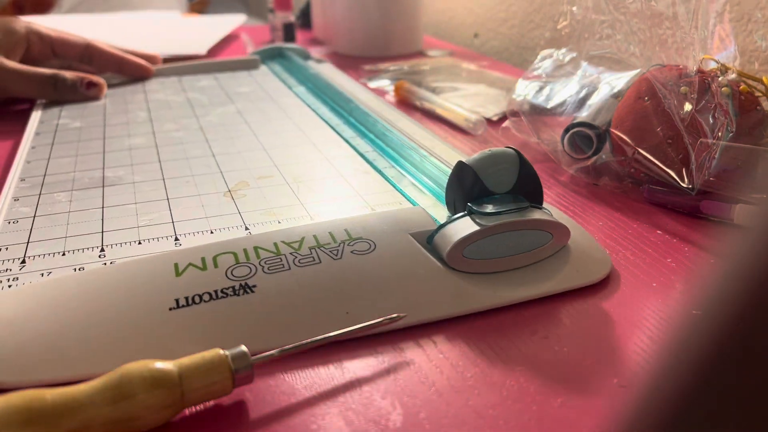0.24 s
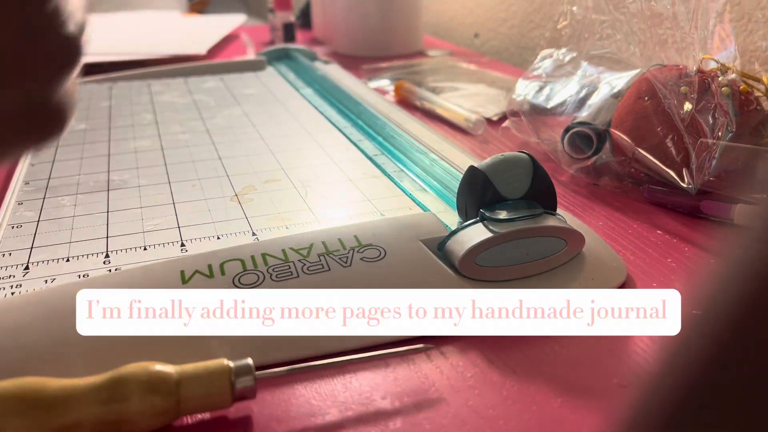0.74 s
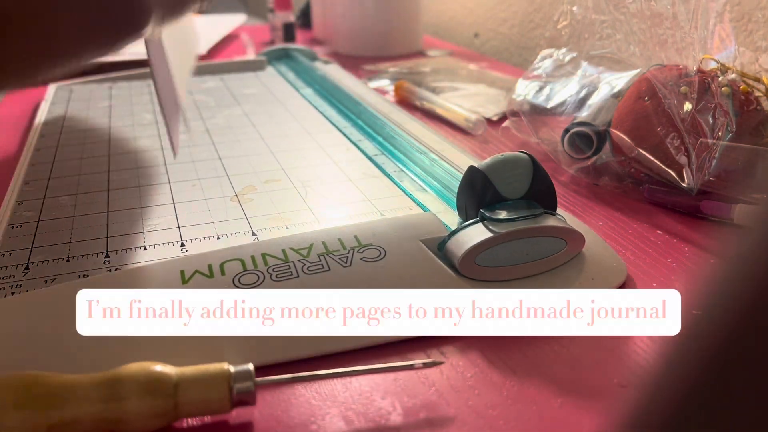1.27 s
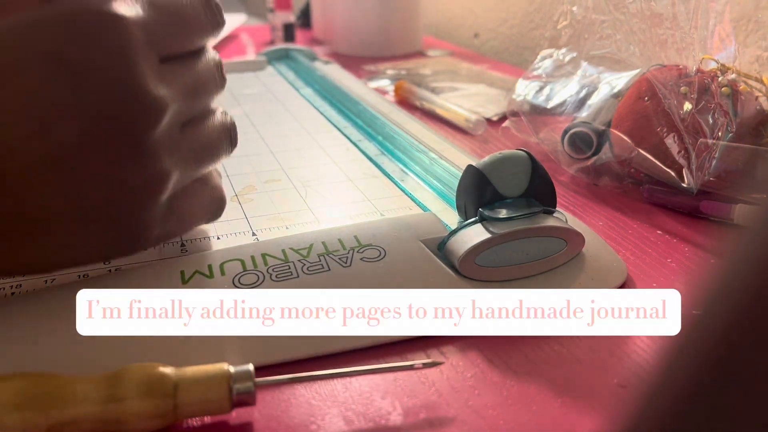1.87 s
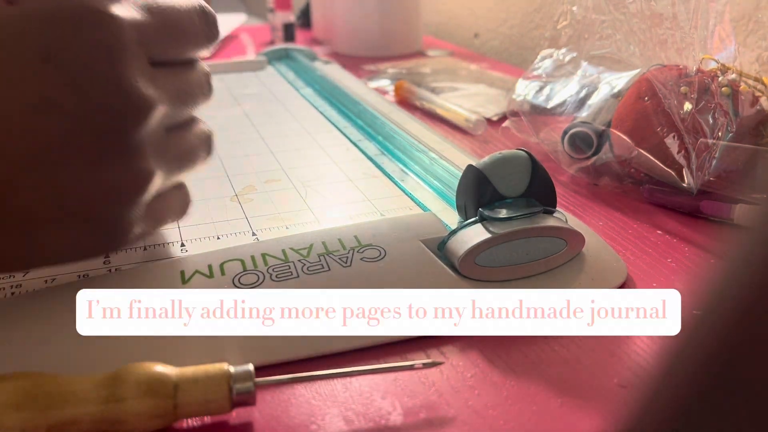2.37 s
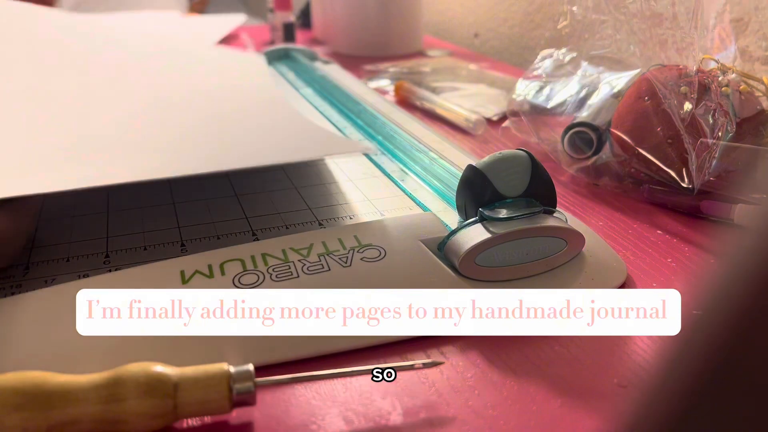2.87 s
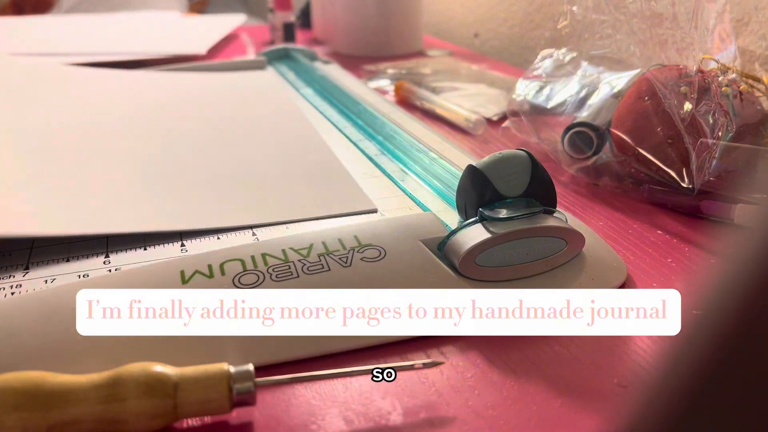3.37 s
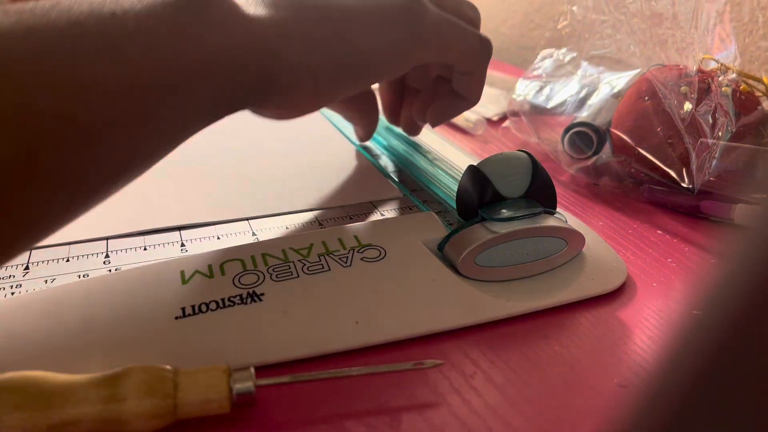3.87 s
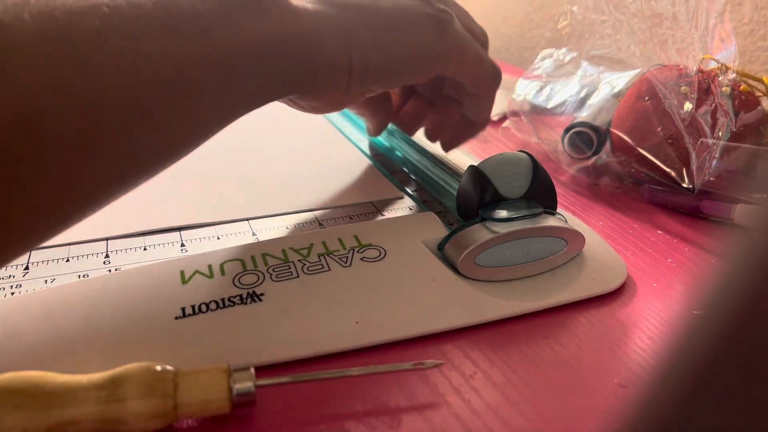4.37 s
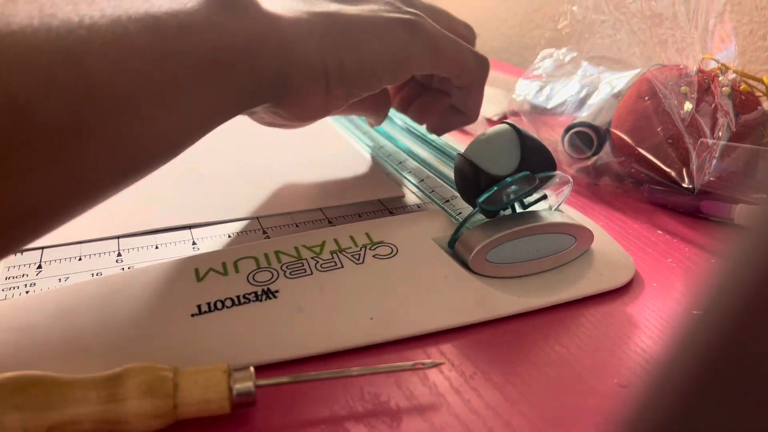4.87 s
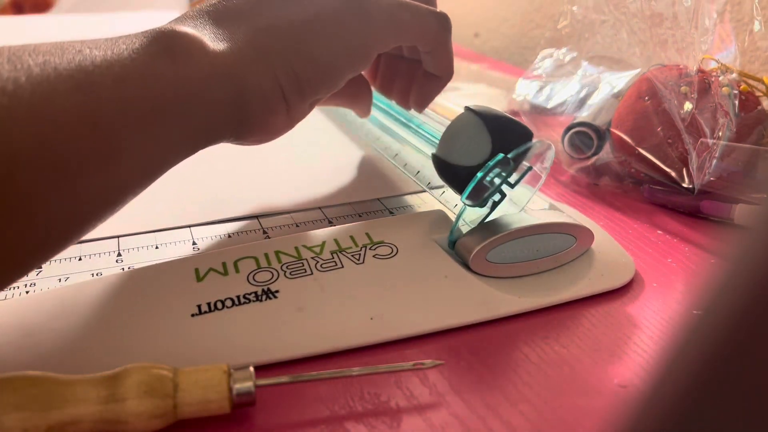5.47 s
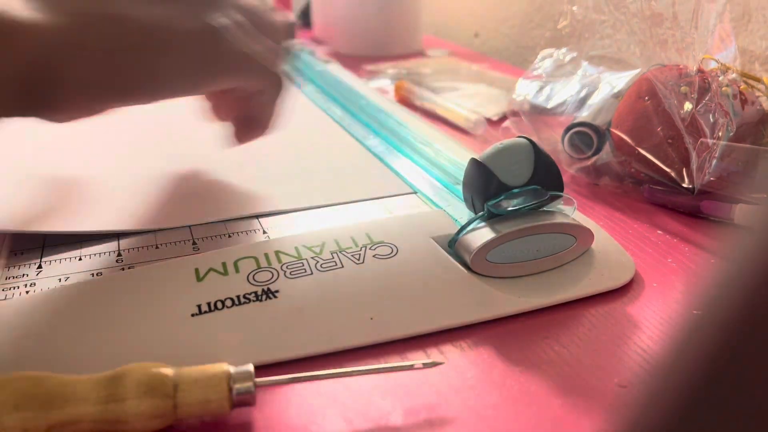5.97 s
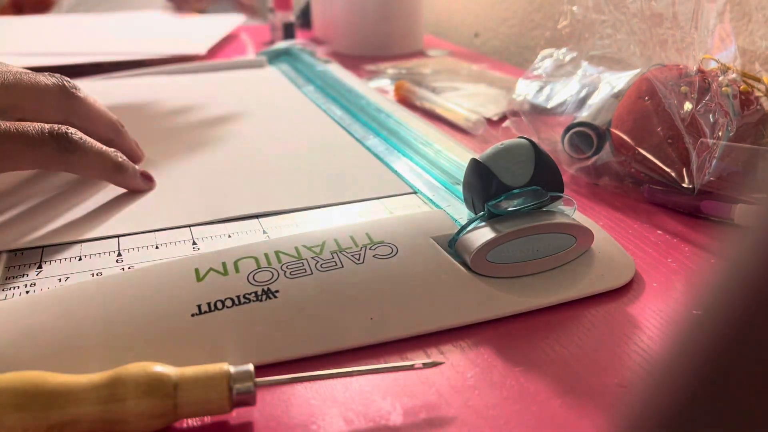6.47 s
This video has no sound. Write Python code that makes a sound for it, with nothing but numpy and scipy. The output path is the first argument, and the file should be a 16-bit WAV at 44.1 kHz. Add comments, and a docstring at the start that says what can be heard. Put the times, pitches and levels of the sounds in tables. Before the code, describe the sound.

Close on a desk in a small room with a faint, wavering low hum. Paper rubs and flaps sharply as it is picked up, then a stack is tapped three times on its edge with solid knocks. It slides onto a plastic trimmer bed. Plastic clicks, the hinged rail swings up with a hard clack, a sheet glides under, and the rail drops back with quick rebounds and a last click.

```python
"""A paper trimmer on a desk in a small room, close to the microphone, over a low hum that wavers.
First, paper flaps and rubs as it is picked up; then the stack is tapped three times on its edge and slid
onto the plastic bed. Next, parts click, the hinged rail swings up, a sheet glides under it, and the rail
drops back with rebounds, followed by a few last touches and glides. Knocks are decaying tones plus
shaped noise; paper is shaped noise that swells and fades, with some ringing of the sheet."""
import sys
import numpy as np
from scipy import signal
from scipy.fft import rfft, irfft, next_fast_len
from scipy.io import wavfile
from scipy.ndimage import map_coordinates

SR = 44100
rng = np.random.default_rng(int(sys.argv[2]) if len(sys.argv) > 2 else 0)


def wav_out(sig):
    """Save sig, one row per channel (or a flat mono array), as 16-bit PCM at SR to the path in sys.argv[1]."""
    wavfile.write(sys.argv[1], SR, np.round(np.clip(np.atleast_2d(sig).T, -1, 1) * 32767).astype(np.int16))


N = 296352  # length of the scene in samples
T = np.arange(16384) / SR  # the clock of one short sound, in seconds

# Soft rumble of the room. Each row: frequency in Hz, relative level in dB per Hz.
ROOM_RUMBLE = [(28, -26), (42, -9), (75, -8), (135, -8), (175, -17), (240, -16), (330, -24), (650, -27),
               (950, -39), (3000, -51), (9000, -58), (16000, -74)]
RUMBLE_DB = -39
# How alike the rumble is on left and right. Each row: frequency in Hz, likeness (1 = the same).
LEFT_RIGHT_LIKENESS = [(60, .97), (250, .85), (1000, .5), (4000, .3)]
# The low hum. Each row: frequency in Hz, level in dB, most it wavers in dB.
HUM = [(56.017, -38.5, 7)]

# Tones at which things ring when struck. Each row: frequency in Hz, relative level in dB,
# seconds to fade by 60 dB. In order: desk, plastic bed, rail and carriage, stiff sheet of paper,
# thin steel, and the bed as it rings on under the tapped stack.
DESK_MODES = [(60.87, -15, 0.3984), (89.21, -2, 0.12), (125.87, 7.5, 0.11108), (179.04, 5, 0.0301)]
BED_MODES = [(253, 10, .14), (325, 0, .07), (443, -1, .12), (541, 0, .16), (612, -3, .15), (676, 0, .17),
             (785, -4, .09), (835, -3, .09), (1050, -2, .07)]
RAIL_MODES = [(1720, 5, .1), (2255, 1, .2), (2850, -3, .11), (3700, -1, .1), (4330, -2, .11),
              (6850, 1, .06), (8180, -4, .05)]
SHEET_MODES = [(780, -1, .04), (965, 0, .04), (1130, -1, .04), (1668, -4, .08), (1990, -3, .03),
               (2250, -4, .07), (2460, -2, .04), (2870, -1, .06)]
STEEL_MODES = [(4230, -5, .12), (4480, 3, .03), (8457, -7, .06)]
BED_UNDER_STACK_MODES = [(522, -2, .34), (565, -1, .42), (620, -2, .38), (711, -1, .32), (845, -5, .25),
                         (1114, -8, .3), (1200, -8, .3), (1766, -12, .32), (1900, -13, .28)]

# Tone colours of noise. Each row: frequency in Hz, relative level in dB per Hz.
# In order: hard clack, bright tick, dull rub, bright hiss, small creases giving way, fine even glide.
CLACK_COLOUR = [(500, -10), (1000, 2), (1400, 0), (1850, -4), (2400, -11), (5000, -22), (9000, -32),
                (11000, -39)]
TICK_COLOUR = [(1500, -22), (2300, -5), (3200, -2), (5200, 0), (5900, -4), (7000, 2), (9000, -2),
               (10500, -18), (16000, -30)]
RUB_COLOUR = [(150, -22.5), (450, -2.5), (900, 0), (1600, -7.5), (3000, -15), (5000, -15), (10000, -38.5)]
HISS_COLOUR = [(1500, -10.5), (3500, 1.5), (6000, -3), (8800, 10.5), (10500, -10.5), (16000, -7)]
CREASE_COLOUR = [(300, -16.5), (900, 1.5), (1600, 5), (2700, -2), (4500, 1.5), (9000, -20.5), (15000, -34)]
GLIDE_COLOUR = [(1200, -4.5), (2400, -15), (4150, 0), (5800, -13.5), (8800, -10.5), (10200, -27.5),
                (15500, -19.5)]
# Tone colours that move with the pitch or centre of the sound.
# Each row: multiple of that pitch or centre, relative level in dB per Hz.
KNOCK_COLOUR = [(.15, -20), (.45, -5), (1, 0), (1.7, -4), (2.7, -16), (6, -42), (16, -72)]
FLAP_COLOUR = [(.1, -22), (.4, -10), (.8, -1), (1.3, 0), (2.1, -7), (3.5, -22), (8, -41), (16, -60)]
SWISH_COLOUR = [(.15, -8.5), (.5, -4.5), (1, 1.5), (1.45, -7.5), (2.1, -18.5), (4, -29), (12, -50.5)]

# Light touches of fingers and paper on the trimmer.
# Each row: start in seconds, knock level in dB, pitch in Hz, tick level in dB.
TOUCHES = [(0.349, -31.5, 445.7, -44), (0.507, -33.5, 307.6, -46), (1.416, -20.5, 148.7, -48.5),
           (1.449, -20, 328.7, -35.5), (2.238, -33.5, 416.9, -60), (3.06, -33, 485.9, -65),
           (3.316, -26, 318.8, -39), (3.838, -37, 380, -62), (3.969, -27, 392.9, -42),
           (4.034, -29, 605.5, -43), (4.343, -28.5, 645.2, -70.5), (4.579, -24, 320.8, -46.5),
           (4.945, -33.5, 744.1, -57.5), (5.157, -25.5, 571.4, -68), (5.307, -35, 620, -75),
           (5.435, -37, 726.9, -66), (5.895, -29.5, 568.4, -64), (5.639, -36.5, 911.2, -43.5),
           (6.0755, -36.5, 1457, -46.5), (6.64, -31, 520, -50)]
PING_S, PING_DB = .349, -35  # start in seconds and level of the small steel ping

# A waved sheet swishes softly through the air.
# Each row: peak in seconds, level in dB, centre in Hz, rise in seconds.
SWISHES = [(.3, -38, 897.3, 0.0754), (2.836, -30.5, 869.6, 0.028), (3.164, -37, 623.7, .012)]
# A flat sheet is eased over the smooth bed. Each row: start in seconds, end in seconds, level in dB.
GLIDES = [(4.97, 5.488, -55), (5.783, 5.948, -53.5), (6.38, 6.671, -63.5)]
# Pushes of paper across the bed. Each row: time of full speed in seconds, hold in seconds,
# seconds to rise by 60 dB, dull rub level in dB, bright hiss level in dB.
PUSHES = [(0.0, 0.3655, .1, -47, -65), (0.283, 0.0648, 0.6891, -41, -52.5),
          (0.751, 0.0809, 0.0429, -43, -42.5), (0.899, 0.07143, 0.8152, -34.5, -62.5),
          (1.019, 0.19866, 2.7933, -49, -59), (1.417, .035, .018, -38, -34),
          (2.337, 0.1118, 0.8754, -48.5, -51), (2.489, 0.2391, 0.0008, -44.5, -53),
          (2.739, 0.04771, 0.0394, -51, -39.5), (3.071, 0.08863, .5, -57.5, -41.5),
          (3.339, 0.21921, 1.5281, -50, -54), (3.822, .015, .03, -60, -54),
          (6.088, 0.13845, 0.6691, -50, -57.5)]
PUSH_T60_S = 0.24966  # seconds for a push to run out by 60 dB
# Sheets flap and buckle. Each row: peak in seconds, level in dB, centre in Hz, rise in seconds.
FLAPS = [(0.757, -36, 1050, .006), (0.836, -25, 1150, .006), (0.86, -16, 1200, .0045),
         (0.877, -12.5, 1350, .0045), (0.904, -28, 1450, .004), (0.987, -28.5, 1650, .006),
         (1.421, -29, 750, .005), (2.415, -41, 2200, .016), (2.525, -40, 2100, .018),
         (2.616, -31, 2800, .003), (2.641, -20, 2400, .007), (2.642, -31, 800, .007),
         (3.059, -25, 1900, .0022), (3.39, -40, 1100, .012), (3.503, -37, 790, .009),
         (5.61, -42, 900, .018), (6.215, -46, 2000, .007)]
FLAP_T60_S, FLAP_T60_PER_RISE = 0.028395, 5.335  # a slow flap also dies slowly
FLAP_HOLD = 0.677  # full strength for this share of the rise time, either side of the peak

# Plastic catches and lets go, then the bed takes the load. Each row: start in seconds, tick level in dB,
# lag of the load in seconds, its knock level in dB, its pitch in Hz, its thump level in dB.
CLICKS = [(0.8246, -27.5, 0.006955, -53.5, 298.3, -23), (3.477, -34.5, .012, -24, 277.9, -37.5),
          (4.47, -33.5, 0.011, -17, 371.2, -52), (4.5315, -21.5, 0.004, -14, 333.4, -22),
          (4.8262, -17, 0.00093, -20, 247, -47.5), (6.058, -34.5, .017, -24.5, 281.7, -21.5)]
# The stack is tapped on its edge. Each row: start in seconds, knock level in dB, desk thump level in dB,
# clack level in dB, lead of the first corner in seconds, corner knock level in dB, corner pitch in Hz,
# corner tick level in dB, corner squash in seconds, shiver of the sheets in dB, ring of the bed in dB.
STACK_TAPS = [(1.47, -8.5, -17, -29, .022, -17, 1000, -28, .006, -44, -33),
              (1.8059, -7.5, -22, -15, .011, -22, 930, -61, .07, -30, -23.5),
              (2.1205, -9, -27, -28, .0065, -10.5, 1050, -35, .002, -33, -28.5)]
# The knock deepens as more of the stack touches: the whole edge, then its full weight.
EDGE_HZ, WEIGHT_HZ = 570, 235
WEIGHT_LAG_S, WEIGHT_DB = 0.0105, -17
# The rail meets its stop and rebounds, going up and coming down. Each row: start in seconds,
# knock level in dB, pitch in Hz, desk thump level in dB, clack level in dB, tick level in dB.
RAIL_STOPS = [(4.799, -7.5, 610, -26, -18, -52), (4.8105, -12, 135, -20, -28, -43),
              (5.667, -14, 800, -38, -15, -38), (5.6945, -14.5, 410, -23, -24, -55),
              (5.724, -26, 140, -20, -52, -70)]

# How fast the room's tail fades. Each row: frequency in Hz, seconds to fade by 60 dB.
ROOM_T60 = [(100, 0.3555), (600, 0.28383), (2000, 0.3311), (6000, 0.2995), (14000, 0.11)]
DIRECT_DB = -1.2759  # the straight path to the microphone
# Level difference between the two microphone ports. Each row: frequency in Hz, left minus right in dB.
PORT_BALANCE = [(60, -.7), (200, -2.5), (400, -2.5), (700, -1), (1290, 2), (2380, 6), (4400, 5), (8100, 1),
                (15000, 0)]
# How far the left port leads, for paper and for the trimmer.
# Each row: frequency in Hz, lead in radians (before the low notes are brought together).
PAPER_LEAD = [(550, -0.1379), (900, -1.4293), (1400, -2.5), (2500, 0.944), (4400, 1.2622), (8100, 1.0293)]
TRIMMER_LEAD = [(300, -0.06), (700, 0.298), (1400, 1), (2800, 0.63), (4400, -0.19), (8100, 1)]
BOTTOM_HZ, TOP_HZ = 39.38, 16400  # the band the microphone passes


def amp(db):
    """Turn decibels into a gain."""
    return 10 ** (np.asarray(db) / 20)


def unit(x, seconds=None):
    """Scale to an rms of 1, over the whole sound or over its first seconds."""
    head = x if seconds is None else x[:int(seconds * SR)]
    return x / np.sqrt(np.mean(head ** 2) + 1e-20)


def along(points, hz):
    """Read a curve of (frequency, value) points on a log frequency axis."""
    point_hz, values = np.transpose(points)
    return np.interp(np.log(hz + 1e-6), np.log(point_hz), values)


def wobble(rate, size=N):
    """Make a smooth random curve through rate random points a second."""
    points = rng.standard_normal(int(size * rate / SR) + 4)
    return map_coordinates(points, [np.arange(size) * rate / SR])


def filtered(x, response):
    """Change the level, and the phase if wanted, of each frequency in a long sound."""
    size = next_fast_len(N + 8192)
    gains = response(np.fft.rfftfreq(size, 1 / SR))
    return irfft(rfft(x, size) * gains, size)[..., :N]


def coloured(x, colour, scale_hz=1):
    """Give a short sound a tone colour with a filter that never acts ahead of the sound."""
    n = len(x)
    hz = np.fft.rfftfreq(n, 1 / SR)
    # folding the cepstrum gives the filter minimum phase
    cepstrum = irfft(np.log(amp(along(colour, hz / scale_hz))))
    cepstrum[1:n // 2] *= 2
    cepstrum[n // 2 + 1:] = 0
    return irfft(rfft(x) * np.exp(rfft(cepstrum)))


def noise_of_colour(x, colour):
    """Give a long noise a tone colour and an rms of 1."""
    return unit(filtered(x, lambda hz: amp(along(colour, hz))))


def fade(t60):
    """Fade exponentially, by 60 dB in t60 seconds."""
    return np.exp(-np.log(1000) * T / t60)


def ring(modes, gains, stretch=1):
    """Add fading sine tones, all struck together; stretch shifts their pitch."""
    return sum(gain * amp(db) * fade(t60) * np.sin(2 * np.pi * hz * stretch * T)
               for (hz, db, t60), gain in zip(modes, gains))


def burst(t60, rattle_db, rattle_t60, onset_t60):
    """A short crack of noise followed by the dense, weaker ringing of plastic."""
    level = fade(t60) + amp(rattle_db) * fade(rattle_t60)
    return rng.standard_normal(len(T)) * level * (1 - fade(onset_t60))


def fibres(size, rate, share):
    """Friction noise: a smooth rush plus single fibres catching, about rate a second."""
    catches = (rng.random(size) < rate / SR) * rng.standard_normal(size)
    return rng.standard_normal(size) + share * unit(catches)


def add(track, s, sound):
    """Mix a sound into a track at s seconds."""
    start = max(round(s * SR), 0)
    track[start:start + len(sound)] += sound[:N - start]


def background():
    """A wavering low hum in soft rumble that is less alike on left and right higher up."""
    def turn(hz):
        return np.arccos(np.clip(along(LEFT_RIGHT_LIKENESS, hz), -1, 1)) / 2

    def split(hz):
        return amp(along(ROOM_RUMBLE, hz)) * [np.cos(turn(hz)), np.sin(turn(hz))]

    mid, side = filtered(rng.standard_normal((2, N)), split)
    rumble = amp(RUMBLE_DB) * unit(np.array([mid + side, mid - side]))
    t = np.arange(N) / SR
    hum = np.zeros(N)
    for hz, db, waver_db in HUM:
        level = np.sqrt(2) * amp(db + waver_db * np.tanh(wobble(3.4)))
        drift = hz / 110 * wobble(6)  # the phase wanders too
        hum += level * np.sin(2 * np.pi * hz * t + drift)
    return (rumble + hum) * amp([[-.5], [.5]])  # left a little softer than right


def knock(db, hz, thump_db, clack_db, tick_db, bed_db=-4, dense_db=-5, rail_db=-14, cycles=11,
          octaves=0.9331, sag=0.36598, sag_s=0.0029923):
    """One contact flexes the bed, thumps the desk and, if hard, cracks and rings the rail."""
    attack = .012  # parts are levelled over their first seconds
    desk_gains = amp(rng.normal(0, 6.63, len(DESK_MODES)))
    desk = unit(ring(DESK_MODES, desk_gains) * (1 - fade(0.023)), 2 * attack)
    # the struck spot swings a few cycles, sinking in pitch as the contact widens
    swing = hz * (T + sag * sag_s * (1 - np.exp(-T / sag_s)))
    spot = unit(fade(cycles / hz) * (1 - fade(2 / hz)) ** 2 * np.sin(2 * np.pi * swing), attack)
    # it hands its motion to the bed tones nearest in pitch
    bed_hz = np.transpose(BED_MODES)[0]
    nearness = np.exp(-.5 * (np.log2(bed_hz / hz) / octaves) ** 2)
    bed_gains = nearness * amp(rng.normal(0, 4, len(BED_MODES)))
    bed = unit(ring(BED_MODES, bed_gains) * (1 - fade(0.0022765)) ** 2, attack)
    dense = unit(coloured(burst(.035, -8, .15, onset_t60=.015), KNOCK_COLOUR, hz), attack)
    body = unit(spot + amp(bed_db) * bed + amp(dense_db) * dense, attack)
    crack = unit(coloured(burst(.012, -12, 0.09, onset_t60=0.0056), CLACK_COLOUR), attack)
    rail_gains = amp(rng.normal(0, 2.5, len(RAIL_MODES)))
    rail = unit(ring(RAIL_MODES, rail_gains, stretch=rng.normal(1, .03)), attack)
    snap = unit(burst(0.009, -24, 0.19, onset_t60=.012), attack) + amp(rail_db) * rail
    tick = unit(coloured(snap, TICK_COLOUR), attack)
    blow = amp(thump_db) * desk + amp(db) * body + amp(clack_db) * crack + amp(tick_db) * tick
    # a gentle touch takes longer to press home than a hard blow
    press = 1 - fade(.001 * amp(-.7 * max(db, tick_db)))
    return press * blow


def touches():
    """Single light contacts of fingers and paper; the clack lies between the knock and the tick."""
    out = np.zeros(N)
    for s, db, hz, tick_db in TOUCHES:
        clack_db = (db + tick_db) / 2 - 1.0
        add(out, s, knock(db, hz, thump_db=db - 7.5, clack_db=clack_db, tick_db=tick_db))
    return out


def ping():
    """A light touch on thin steel rings briefly."""
    out = np.zeros(N)
    tones = ring(STEEL_MODES, np.ones(len(STEEL_MODES))) * (1 - fade(.006))
    add(out, PING_S, amp(PING_DB) * unit(tones, .007))
    return out


def swishes():
    """The waved sheet pushes air: a soft, hollow swell with no edge."""
    out = np.zeros(N)
    for s, db, hz, rise in SWISHES:
        swell = np.exp(-np.abs(T - 2 * rise) / rise) * (1 - fade(4 * rise))
        air = unit(coloured(rng.standard_normal(len(T)), SWISH_COLOUR, hz))
        add(out, s - 2 * rise, amp(db) * swell * air)
    return out


def glides(rise_share=0.3908, stop_s=0.041, waver_db=1):
    """The sheet gathers speed slowly, hissing evenly, and stops short."""
    t = np.arange(N) / SR
    speed = np.zeros(N)
    for start, end, db in GLIDES:
        gather = (t - start) / (rise_share * (end - start))
        stop = (end - t) / stop_s
        speed += amp(db) * np.clip(np.minimum(gather, stop), 0, 1)
    hiss = noise_of_colour(rng.standard_normal(N), GLIDE_COLOUR)
    return speed * hiss * amp(waver_db * wobble(20))


def slides(catch_db=2.5, crease_db=-4):
    """Paper drags, gripping unevenly: each push speeds up, holds and runs out, and creases crackle."""
    t = np.arange(N) / SR
    rub_level, hiss_level = np.zeros(N), np.zeros(N)
    for s, hold, rise, rub_db, hiss_db in PUSHES:
        before = np.maximum(s - t, 0) / rise
        after = np.maximum(t - s - hold, 0) / PUSH_T60_S
        speed = np.exp(-np.log(1000) * (before + after))
        rub_level = np.maximum(rub_level, speed * amp(rub_db))
        hiss_level = np.maximum(hiss_level, speed * amp(hiss_db))
    rub = rub_level * noise_of_colour(fibres(N, rate=300, share=.85), RUB_COLOUR)
    hiss = hiss_level * noise_of_colour(fibres(N, rate=300, share=.85), HISS_COLOUR)
    grip = amp(catch_db * wobble(45))
    snaps = (rng.random(N) < 200 / SR) * rng.standard_normal(N)  # about 200 a second
    crumple = signal.fftconvolve(snaps, fade(.005))[:N] * rng.standard_normal(N)
    crease_level = amp(crease_db) * np.sqrt(rub_level * hiss_level)
    return (rub + hiss) * grip + crease_level * noise_of_colour(crumple, CREASE_COLOUR)


def flap(db, hz, rise, t60, push_db, sheet_db=-2, hard_db=-15, octaves=0.36555):
    """A sheet swells into a slap; a hard one rings its nearest tones, a dull one shakes the desk more."""
    t, hold = T - 2 * rise, FLAP_HOLD * rise  # t is 0 at the peak
    growth = 2 * np.minimum(t + hold, 0) / rise
    decay = np.log(1000) * np.maximum(t - hold, 0) / t60
    swell = (1 - fade(2 * rise)) * np.exp(growth - decay)
    friction = unit(fibres(len(T), rate=1200, share=1.0) * amp(2 * wobble(380, size=len(T))))
    slap = unit(coloured(friction, FLAP_COLOUR, hz)) * swell
    sheet_hz = np.transpose(SHEET_MODES)[0]
    nearness = np.exp(-.5 * (np.log2(sheet_hz / hz) / octaves) ** 2)
    modes = ring(SHEET_MODES, nearness, stretch=rng.normal(1, .02))
    # the friction drives the tones of the sheet
    driven = signal.fftconvolve(friction * swell, modes / np.linalg.norm(modes))[:len(T)]
    sheet = driven * nearness.max()
    desk = unit(ring(DESK_MODES, np.ones(len(DESK_MODES))) * (1 - fade(2 * rise)), .03)
    push = desk * min(1, (1000 / hz) ** 2)
    hardness = min(1, amp((db - hard_db) / 2))
    return amp(db) * (slap + amp(sheet_db) * hardness * sheet + amp(push_db) * push)


def flaps():
    """Sheets buckle and slap as the paper is lifted and laid down."""
    out = np.zeros(N)
    for s, db, hz, rise in FLAPS:
        t60 = FLAP_T60_S + FLAP_T60_PER_RISE * rise
        add(out, s - 2 * rise, flap(db, hz, rise, t60, push_db=-3.5))
    return out


def clicks():
    """A bright snap of plastic, then a dull knock as the bed takes the load."""
    out = np.zeros(N)
    for s, tick_db, lag, db, hz, thump_db in CLICKS:
        snap = knock(tick_db - 3, hz=1150, thump_db=tick_db - 18, clack_db=tick_db - 1, tick_db=tick_db)
        load = knock(db, hz, thump_db=thump_db, clack_db=db - 14.5, tick_db=db - 29.0)
        add(out, s, snap)
        add(out, s + lag, load)
    return out


def stack_taps():
    """The stack lands corner first, then edge, then weight; loose sheets shiver and the bed rings on."""
    out = np.zeros(N)
    for (s, db, thump_db, clack_db, lead, corner_db, corner_hz, tick_db, squash, shiver_db,
         ring_db) in STACK_TAPS:
        corner = knock(corner_db, corner_hz, thump_db=corner_db - 21, clack_db=tick_db + 10.5,
                       tick_db=tick_db)
        add(out, s - lead, corner * (1 - fade(squash)))  # the squash softens its start
        edge = knock(db, EDGE_HZ, thump_db=thump_db, clack_db=clack_db, tick_db=clack_db - 17,
                     bed_db=-6, dense_db=-1, cycles=7)
        add(out, s, edge)
        weight = knock(WEIGHT_DB, WEIGHT_HZ, thump_db=-23, clack_db=-50, tick_db=-55)
        add(out, s + WEIGHT_LAG_S, weight)
        add(out, s, flap(shiver_db, hz=720, rise=.008, t60=.4, push_db=0))
        # the shifting stack damps each tone of the bed unevenly
        unsteady = [amp(4 * wobble(45, size=len(T))) for mode in BED_UNDER_STACK_MODES]
        bed = unit(ring(BED_UNDER_STACK_MODES, unsteady) * (1 - fade(.03)), .05)
        add(out, s, amp(ring_db) * bed)
    return out


def rail_stops():
    """The rail swings up against its stop and later drops back; each rebound is lower and duller."""
    out = np.zeros(N)
    for s, db, hz, thump_db, clack_db, tick_db in RAIL_STOPS:
        add(out, s, knock(db, hz, thump_db, clack_db, tick_db, cycles=7))
    return out


def room(x, near_db=-6.5, tail_db=-15, near_t60=0.023856):
    """Things on the desk scatter the sound almost at once; the walls add a short tail."""
    hz, t, grid = signal.stft(rng.standard_normal((2, SR // 2)), SR, nperseg=256)
    fading = np.exp(-np.log(1000) * t / along(ROOM_T60, hz)[:, None])
    tail = signal.istft(grid * fading, SR, nperseg=256)[1]
    near = rng.standard_normal((2, len(T))) * fade(near_t60)
    x = signal.lfilter(*signal.butter(1, 300, "high", fs=SR), x)  # long waves are hardly scattered

    def answer(echo, delay_s):
        delayed = np.pad(x, (int(delay_s * SR), 0))[None]
        return signal.fftconvolve(delayed, echo / np.linalg.norm(echo[0]), axes=1)[:, :N]

    return amp(near_db) * answer(near, .001) + amp(tail_db) * answer(tail, .008)


def ports(x, lead):
    """Two microphone ports hear different level and phase; long waves reach both nearly in step."""
    def left_and_right(hz):
        apart = hz ** 2 / (hz ** 2 + 300 ** 2)
        half = amp(along(PORT_BALANCE, hz) / 2) * np.exp(.5j * along(lead, hz) * apart)
        return np.array([half, 1 / half])

    return filtered(x, left_and_right)


def scene():
    """Paper, stack and rail reach the microphone directly and by way of the room."""
    paper = flaps() + swishes() + slides() + glides()
    rail = rail_stops() + clicks() + touches() + ping()
    places = [(paper, PAPER_LEAD), (stack_taps(), TRIMMER_LEAD), (rail, TRIMMER_LEAD)]
    heard = sum(amp(DIRECT_DB) * ports(sound, lead) + room(sound) for sound, lead in places)
    return heard + background()


def record(dry):
    """The microphone drops the deepest rumble, rounds the loudest peaks and cuts the top."""
    lean = signal.sosfilt(signal.butter(5, BOTTOM_HZ, "high", fs=SR, output="sos"), dry)
    rounded = lean / (1 + np.abs(lean) ** 6) ** (1 / 6)
    return filtered(rounded, lambda hz: hz < TOP_HZ)


dry = scene()
out = record(dry)
wav_out(out)
```